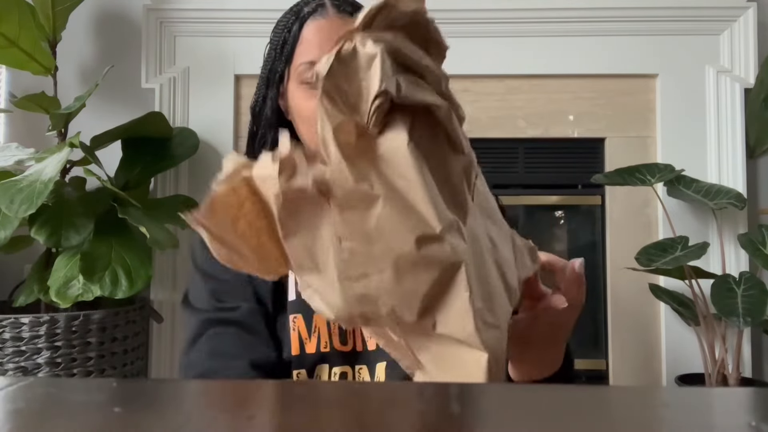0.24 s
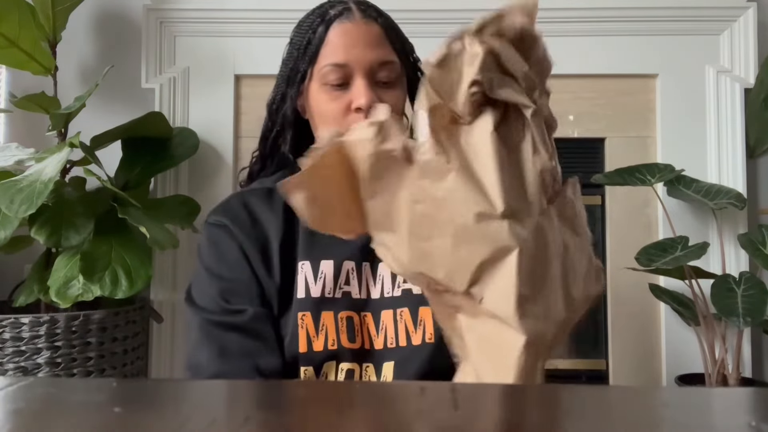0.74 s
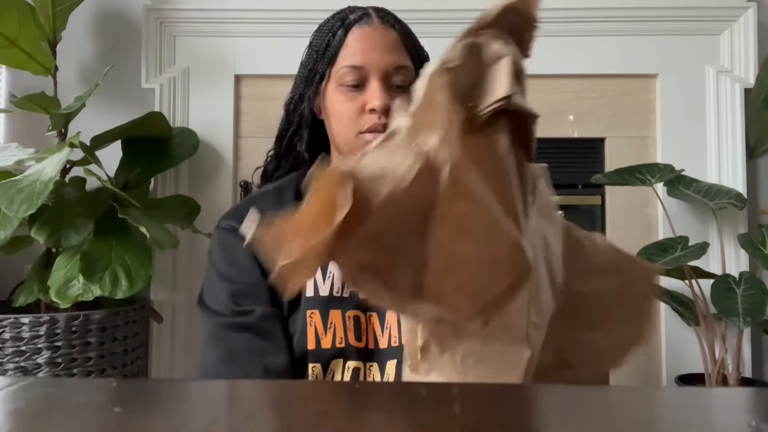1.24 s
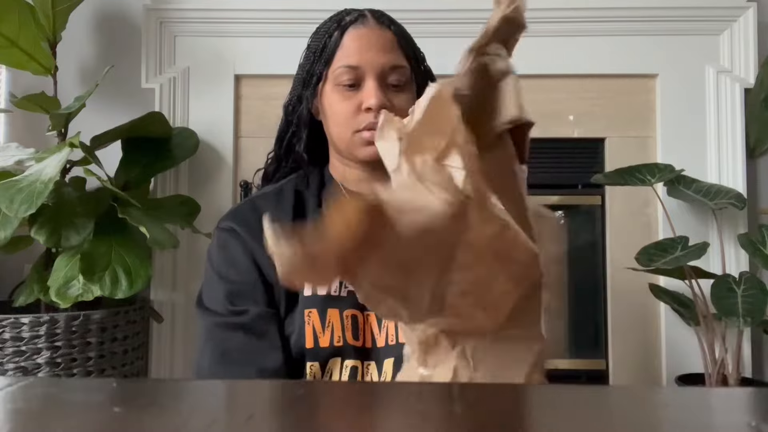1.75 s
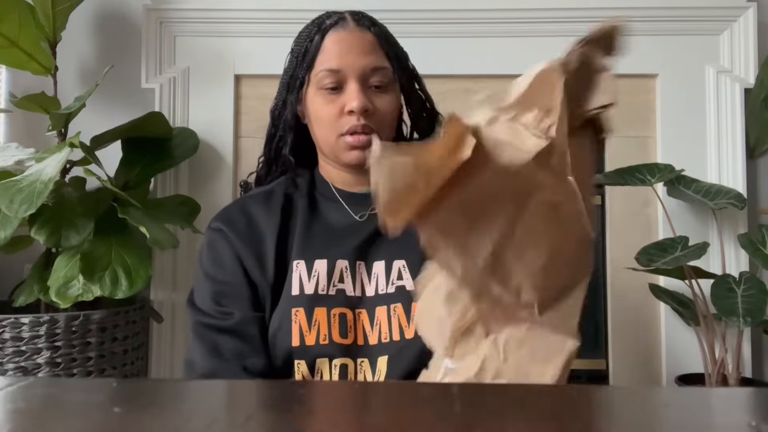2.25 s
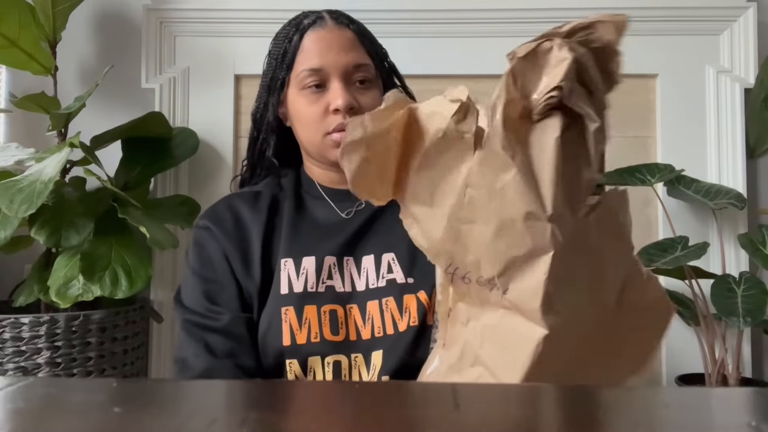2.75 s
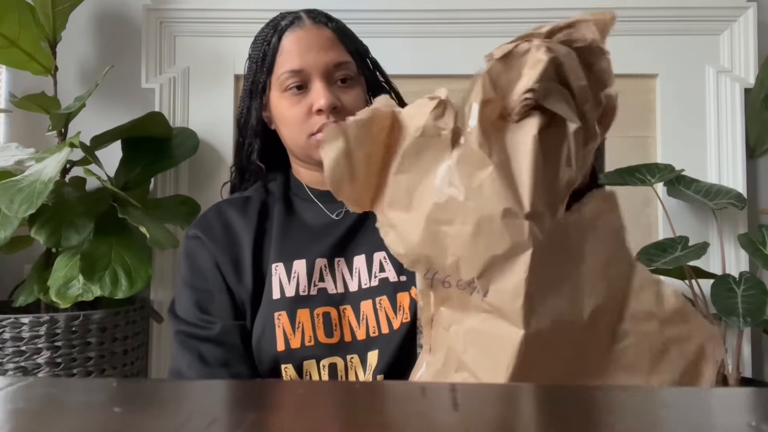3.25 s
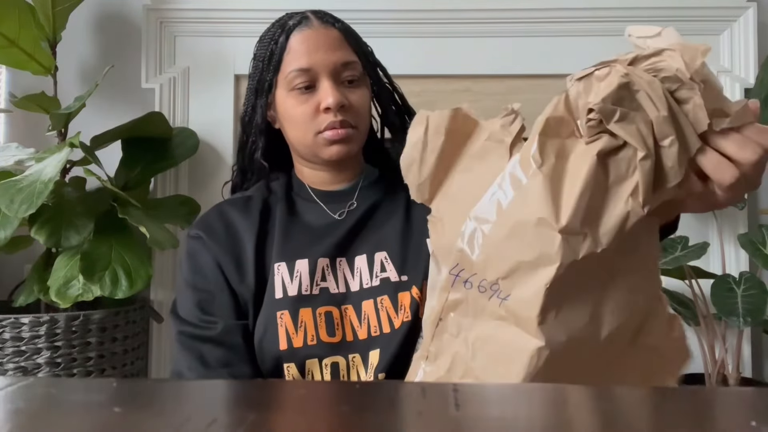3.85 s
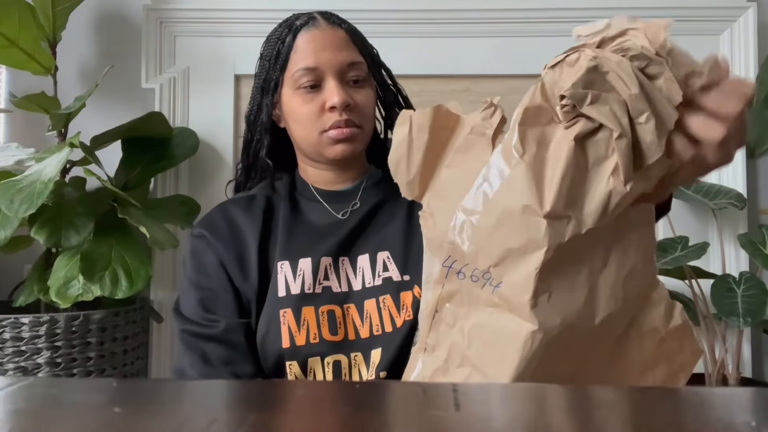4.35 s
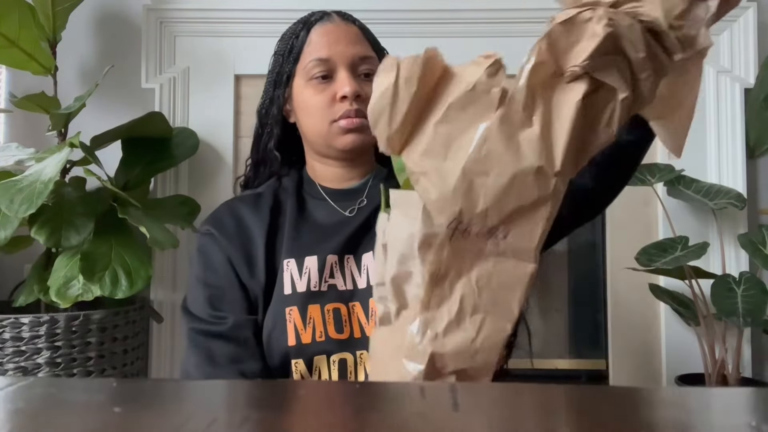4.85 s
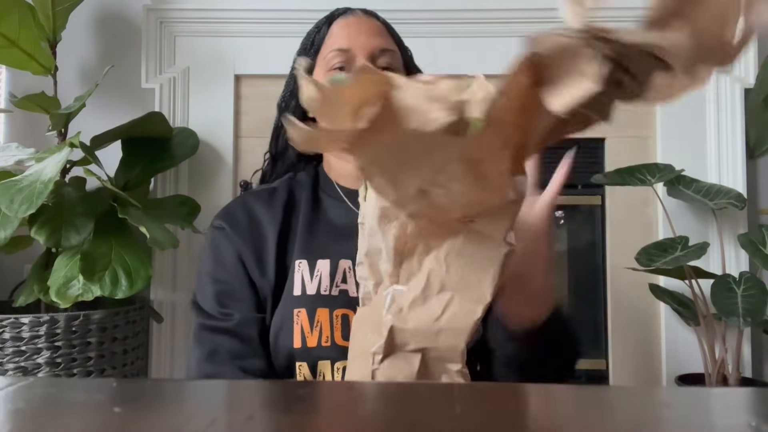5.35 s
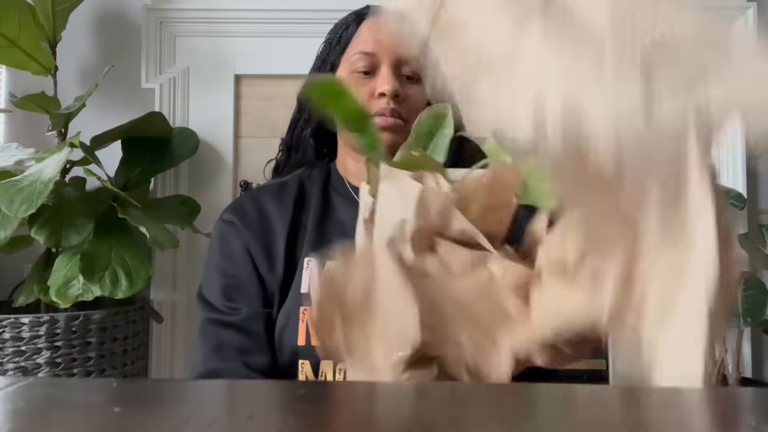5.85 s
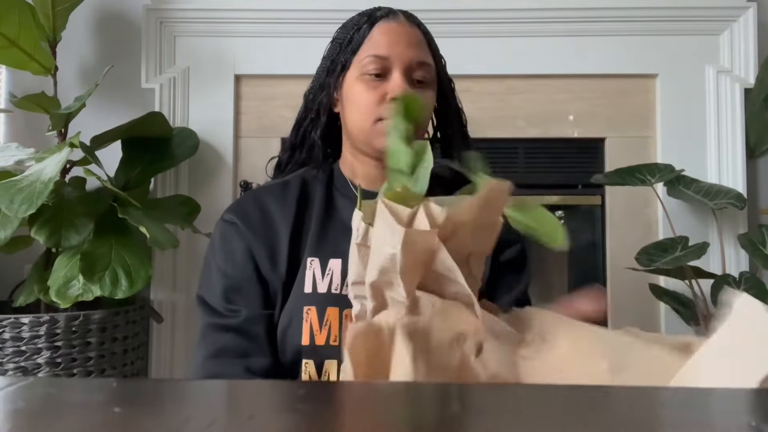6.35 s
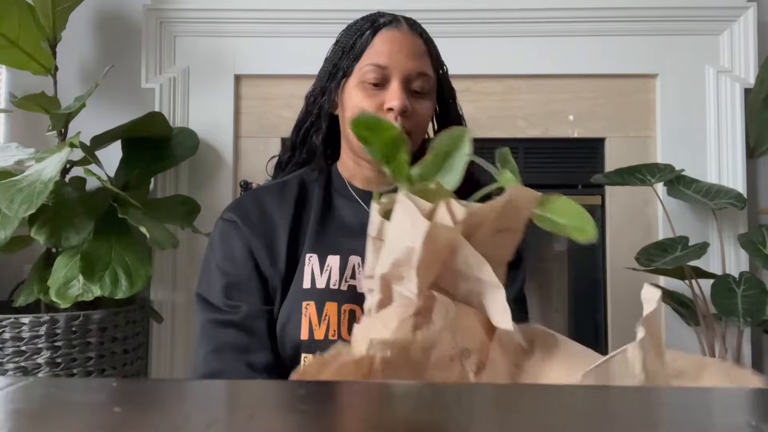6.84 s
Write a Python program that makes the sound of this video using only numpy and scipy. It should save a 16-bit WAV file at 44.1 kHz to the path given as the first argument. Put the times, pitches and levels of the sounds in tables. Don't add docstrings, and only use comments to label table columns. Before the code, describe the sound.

Stiff brown packing paper is unrolled by hand at close range, rustling and crackling in uneven bursts, then crumpled hard and bumped softly on a table.

```python
import sys
import numpy as np
from scipy import signal
from scipy.fft import rfft, irfft
from scipy.io import wavfile
from scipy.ndimage import uniform_filter1d, map_coordinates

SR = 44100
rng = np.random.default_rng(int(sys.argv[2]) if len(sys.argv) > 2 else 0)


def convert_level_to_amplitude(level_db):
    exponent = np.asarray(level_db, float) / 20
    return 10 ** exponent


def generate_wav(sig):
    pcm = np.round(np.clip(np.atleast_2d(sig).T, -1, 1) * 32767).astype(np.int16)
    wavfile.write(sys.argv[1], SR, pcm)


N = 312228
TIME = np.arange(N) / SR

# start of hold in seconds, hold in seconds, crackle in dB,
# weight of the large panels in dB above the crackle.
STROKES = [(0, 0.0067, -35.5, 3.5), (0.381, 0.029, -44, 6.5), (0.558, 0.042, -50, 1.5),
           (0.763, 0.064, -49.5, 10.5), (1.009, 0.15, -32, 3.5), (1.198, 0.16, -29.5, 2.5),
           (1.447, 0.13, -45, -1.5), (1.79, 0.05, -49.5, 4), (1.918, 0.02, -48, -2), (2.213, 0.086, -45, 3),
           (2.916, 0.04, -42, -1), (3.226, 0.095, -48, 1), (4.388, 0.09, -42.5, 0.5),
           (4.495, 0.17, -37.5, -2), (4.742, 0.089, -41.5, -1), (4.978, 0.057, -43, -6),
           (5.096, 0.047, -50.5, 5.5), (5.302, 0.051, -53, -2), (5.52, .015, -56, 6),
           (6.343, 0.063, -47.5, -7), (2.35, 0.034, -43.5, 2), (5.757, 0.13, -33, -1),
           (5.984, 0.072, -31.5, -2), (6.138, 0.045, -33, -3), (6.267, 0.018, -37.5, -7),
           (6.613, 0.12, -48.5, 9), (6.977, 0.037, -45.5, 3)]
JERKS = [(0.068, 0.014, -44.5, 2.5), (0.199, 0.011, -48.5, 10.5), (0.3, 0.023, -45.5, 6),
         (0.739, 0.049, -46.5, 1), (0.959, 0.055, -38.5, 8), (1.732, 0.076, -45, -5.5),
         (1.926, 0.085, -47.5, 3), (2.091, 0.043, -45, 8), (2.661, 0.09, -47.5, 0.5),
         (3.545, 0.08, -49.5, 2), (3.904, 0.017, -62.5, -6), (4.115, 0.0066, -66.5, -3),
         (4.631, 0.11, -38.5, 0), (5.525, 0.059, -46, 2.5), (5.624, 0.077, -43, 3),
         (5.743, 0.016, -32.5, -1), (6.578, 0.013, -39, -12), (6.874, 0.049, -47.5, -1)]
RISE_DB_PER_S, FALL_DB_PER_S, JERK_DB_PER_S = 215, 161, 3000
FALL_GROWS = 8
# time in seconds, crackle in dB,
# weight of the large panels in dB above the crackle.
SLIDE = [(0.0, -55, 6.5), (0.5, -55, 4.5), (1.65, -51, 4.5), (2.4, -61, 14), (2.6, -63.5, 4.5),
         (3.0, -43, -4.5), (3.45, -51.5, 4), (3.75, -62, 4), (4.0, -72, 12), (4.22, -82, 10.5),
         (4.6, -55, 15.5), (5.1, -76, 21), (5.47, -63, 1), (6.0, -40.5, -8), (6.4, -55, 4),
         (6.56, -45, -2.5), (6.85, -55, 1), (7.08, -70, 12)]
# time in seconds, lag of the left port in samples.
PLACE = [
    (0, 7.7),
    (1.2, 8.85),
    (2.2, 8.15),
    (3.5, 10.9),
    (5.2, 12.73),
    (5.8, 7.95),
    (7.08, 7.9),
]
# time in seconds, sheen in dB above the crackle.
FACING = [
    (0, -7.5),
    (1.3, -6),
    (2.0, -8.5),
    (3.0, -10),
    (3.8, -12),
    (4.5, -11),
    (5.2, -5.5),
    (6.0, -8),
    (7.08, -9),
]
PAN_DB = -1.3

# frequency in Hz, density in dB per Hz.
BODY = [(70, -47), (150, -6), (250, -2.5), (400, -1), (600, -1.5), (900, -3.5), (1200, -7), (1700, -35)]
KNOCK = [(700, -36.5), (1150, 0.5), (1700, 3.5), (2300, -1.5), (3400, -34.5)]
CRACKLE = [(1600, -16.5), (2500, 0.5), (4000, -4.5), (6000, -6), (7500, -13), (10000, -72.5)]
SHEEN = [(5000, -17), (7500, -3), (9000, 1), (12000, -3), (15500, -9), (17000, -18)]
KNOCK_SHARE = 0.41

# time in seconds, peak in dB, panel pitch in Hz,
# sheen in dB above the peak.
CRACKS = [(0.072, -26, 996, -15), (0.075, -22, 990, -16), (0.0924, -49, 435, -11), (0.1197, -38, 1600, -6),
          (0.2987, -42, 668, -2), (0.363, -41, 991, -1), (0.5585, -47, 676, 1.5), (1.4437, -30, 956, -27),
          (1.5227, -24.5, 670, -16), (1.6901, -41, 751, -11), (1.731, -35, 434, 3.5),
          (1.9213, -35, 1060, -21), (1.943, -25, 1340, -13), (1.961, -43, 436, -19), (2.106, -25, 670, -22),
          (2.182, -48, 608, -21), (2.227, -33, 1050, -13), (2.9074, -33.5, 520, -16),
          (2.9689, -24, 403, -34), (3.0209, -28.5, 418, -37), (3.1613, -27.5, 730, -18),
          (3.1994, -44, 797, -9), (3.5489, -31, 990, -14), (4.6288, -17.5, 690, -12.5),
          (4.9417, -40, 694, -17), (5.6362, -18, 810, -20), (5.756, -18, 695, -16),
          (5.8398, -18.5, 766, -19), (6.0033, -16.5, 775, -29), (5.997, -31, 2600, -16),
          (6.009, -30, 900, -25), (6.27, -37, 2970, -28)]
CRACK_BODY_DB, CRACK_KNOCK_DB = -14, -15
# time in seconds, peak in dB, panel pitch in Hz, body in dB above the peak.
POPS = [(0.0111, -26.5, 378, -5), (0.161, -38, 380, -6), (0.319, -35, 438, 0), (0.6045, -41, 380, -0.5),
        (0.7262, -43, 381, 6), (0.751, -43, 439, -10), (0.952, -32, 605, -2.5), (2.095, -37, 662, -2),
        (2.148, -29.5, 670, 2.5), (2.665, -33, 684, -8), (2.7177, -37, 694, -8), (3.8891, -56, 715, 16),
        (4.5447, -27.5, 513, -1), (4.6593, -29.5, 774, -2.5), (5.1647, -42, 546, 0), (5.184, -42, 467, -1),
        (5.738, -31, 526, -10), (6.0394, -24, 656, -10), (6.4636, -47, 396, -2), (6.607, -31, 463, -12),
        (6.664, -31, 850, -4.5), (6.708, -25, 412, -18), (6.7296, -33, 590, -5)]
POP_KNOCK_DB, POP_SHEEN_DB = -2.5, -24
# time in seconds, peak in dB,
# facet pitch in Hz, knock in dB above the peak.
KNOCKS = [(0.2162, -27.5, 1270, -9), (0.7854, -41, 1830, -1), (1.909, -50, 1270, -6),
          (3.3272, -33, 1550, 0), (4.7003, -24.5, 1320, -3), (5.016, -41, 2430, -5),
          (5.122, -40, 1560, 2.5), (5.21, -45, 1880, 4.5), (5.5321, -28, 1400, 5.5),
          (5.7, -31.5, 1670, -5.5), (5.932, -22, 1910, -23), (6.1428, -19, 1840, -9),
          (6.596, -20.5, 1690, -8), (6.6206, -22.5, 1910, -6), (6.9428, -36, 1520, -1),
          (3.568, -53, 1500, -11),
    (5.508, -42, 2110, 6),
    (5.884, -35, 1500, -20),
    (6.177, -26, 1800, -1),
    (6.684, -33, 2550, -2),
    (6.74, -49.5, 1910, 18),
]
KNOCK_BODY_DB, KNOCK_SHEEN_DB = -8.5, -16.5
# time in seconds, peak in dB, panel pitch in Hz.
SETTLING = [(2.496, -50, 773), (3.258, -41, 690), (3.4087, -74, 770), (3.6744, -40, 670),
            (3.7754, -50, 2820), (3.8026, -47, 455), (3.9048, -41.5, 507), (4.001, -58, 700),
            (4.0337, -53, 463), (4.121, -52, 437), (4.2804, -55, 764), (4.3248, -42, 441),
            (4.3958, -47, 522), (4.9708, -48, 2480), (5.295, -41.5, 526), (5.39, -59, 427),
            (5.49, -41, 450), (6.1117, -38, 605), (6.4183, -40, 1040), (6.514, -45, 1570)]
SETTLE_BODY_DB, SETTLE_KNOCK_DB, SETTLE_SHEEN_DB = -11, -6, -19

# middle in seconds, length in
# seconds, pitch in Hz, level in dB.
SCRAPES_AND_NICKS = [(0.503, 0.068, 1400, -66), (0.529, 0.083, 5000, -74), (0.682, .06, 2500, -52),
                     (1.029, 0.09, 4330, -44), (1.079, 0.086, 5500, -40), (1.136, 0.041, 1600, -29),
                     (1.13, 0.053, 390, -35), (1.153, 0.12, 5340, -47), (1.269, 0.13, 704, -37),
                     (1.365, 0.035, 1200, -55), (1.945, 0.0056, 3180, -30), (1.946, 0.006, 5200, -41),
                     (2.114, 0.038, 705, -50), (4.452, 0.076, 3080, -46), (4.506, 0.043, 3100, -45),
                     (4.549, 0.042, 3220, -43), (4.664, 0.013, 810, -33.5), (5.317, 0.053, 3040, -60),
                     (5.528, 0.015, 2110, -37), (5.548, .012, 1900, -48), (5.756, 0.012, 2970, -47),
                     (5.802, 0.15, 4300, -46), (5.82, 0.14, 638, -43), (6.028, 0.077, 776, -37.5),
                     (6.047, .05, 5600, -38), (6.059, 0.015, 706, -42), (6.145, 0.017, 2180, -27),
                     (6.138, 0.025, 4400, -39.5), (6.2, 0.02, 1720, -36), (6.275, 0.04, 4300, -44),
                     (6.932, 0.12, 121, -50), (6.006, .014, 1950, -32), (6.359, 0.11, 4070, -57),
                     (1.2, 0.054, 504, -45), (1.213, 0.084, 4300, -43), (1.39, 0.032, 3500, -45),
                     (2.395, 0.015, 330, -44), (5.639, 0.013, 1610, -32.5), (5.76, .03, 5500, -46),
                     (0.224, 0.0079, 5630, -45.5), (.321, 0.0034, 895, -39), (0.318, .008, 5460, -48),
         (0.582, .008, 3680, -53), (0.729, 0.011, 680, -48), (0.79, 0.0092, 3900, -41.5),
         (1.106, 0.0093, 3400, -33.5), (1.309, .01, 4330, -31.5), (1.909, 0.0044, 1380, -41),
         (2.104, .006, 4840, -41), (2.147, 0.0052, 9200, -40), (2.184, 0.0087, 5800, -44.5),
         (2.498, .008, 1500, -57.5), (3.547, 0.0065, 3400, -46.5), (3.891, 0.0073, 1290, -47),
         (3.908, 0.005, 3100, -56), (3.906, .006, 5800, -51), (4.13, 0.017, 5440, -60),
         (5.119, 0.0062, 3900, -46), (5.214, 0.0071, 1940, -41), (5.211, 0.0063, 4430, -50),
         (5.219, 0.0079, 790, -48), (5.373, 0.016, 547, -61.5), (5.528, 0.0036, 1490, -35),
         (5.545, 0.0078, 1500, -51), (2.304, 0.011, 755, -40), (5.703, 0.014, 363, -45),
         (5.739, 0.0071, 1520, -39), (5.765, 0.019, 379, -35.5), (5.843, 0.021, 374, -39),
         (6.21, 0.016, 560, -47), (6.277, .01, 3000, -30), (6.334, 0.031, 555, -51),
         (6.42, 0.0073, 1500, -42), (6.464, 0.0057, 1500, -48), (6.606, 0.0058, 596, -33),
         (6.652, 0.0089, 546, -40), (6.666, .01, 1500, -42), (6.683, 0.011, 2480, -29.5),
         (6.731, 0.0047, 1620, -40), (6.792, .02, 380, -57), (6.875, 0.013, 337, -45),
         (6.944, 0.0064, 1590, -39), (7.015, 0.036, 210, -46), (7.038, 0.013, 765, -54)]
NICK_S = .013
SCRAPE_WIDTH, SCRAPE_GRIT_DB = 0.28, 1

# time in seconds,
# middle band in dB, top band in dB.
CLICKS = [(0.218, -35, -48), (.319, -38, -46), (0.365, -44, -44), (.726, -41, -52), (1.459, -39, -48),
          (1.519, -39, -48), (1.732, -32, -34), (1.909, -45, -55), (1.943, -24, -33), (1.962, -34, -48),
          (2.097, -36, -46), (2.147, -28, -40), (2.496, -52, -65), (2.667, -46, -50), (2.968, -25, -39),
          (3.26, -50, -46), (3.328, -44, -48), (3.549, -38, -47), (3.568, -54, -48), (4.057, -57, -72),
          (4.543, -36, -21), (4.629, -30, -33), (4.643, -38, -20), (4.878, -39, -55), (5.211, -46, -58),
          (5.294, -42, -53), (5.298, -56, -38), (5.331, -56, -38), (5.355, -57, -41), (5.397, -55, -35.5),
          (5.489, -57, -61), (5.526, -45, -42), (5.636, -34, -32), (5.655, -29, -41), (5.702, -38, -39),
          (5.735, -34, -36), (5.84, -25, -38), (6.421, -39, -52), (6.464, -45, -33), (6.588, -33, -42),
          (6.597, -32, -34), (6.622, -31, -33), (6.708, -30, -37), (6.729, -32, -47), (6.942, -38, -52),
          (4.699, -31, -44), (4.658, -34, -44)]
# frequency in Hz, gain in dB.
CLICK_MIDDLE = [(400, -30), (900, -3), (2000, 0), (6000, 0), (7500, -20), (10000, -60)]
CLICK_TOP = [(4500, -36), (6500, -1), (8000, 3), (12000, -1.5), (16500, -4)]
CLICK_RISE_S, CLICK_T60_S = .0003, 0.012
BRACE_DB, BRACE_S = 2, 0.0093

# time in seconds, level in dB, first pitch in Hz, last pitch in Hz,
# t60 in seconds.
BUMPS = [
    (6.867, -31, 423, 95, 0.23),
    (6.995, -43, 324, 129, 0.093),
]
TABLE_S, TABLE_SHARE = .00092, 0.063

# frequency in Hz, t60 in seconds.
ROOM = [(200, 0.19), (2000, 0.26), (10000, 0.23)]
# time in seconds, level in dB.
GUSTS = [
    (.35, -45),
    (.43, -55),
    (1.34, -43.5),
    (3.6, -58),
    (3.75, -52),
    (3.92, -59),
    (5.8, -50),
    (6.3, -46),
    (6.5, -53),
    (7.0, -46),
]
GUST_S = 0.1
STILL_AIR_DB, STIRRED_DB, STIR_GROWS = -54, -50, 0.68
# frequency in Hz, density in dB per Hz.
RUMBLE = [(15, -46), (28, -23), (65, -4), (126, -7.5), (194, -14), (260, -13.5), (340, -58.5), (570, -120)]
HUSH = [(150, -17.5), (300, 1.5), (600, -5), (2000, -22), (5000, -28), (9500, -26), (16000, -30)]

# frequency in Hz, gain in dB.
SUM = [(6300, 1), (7300, -4), (8000, -1.5), (8800, -6.5), (10300, -1), (13800, 2), (14600, -13)]
DIFFERENCE = [(9000, 0.5), (10300, -6), (13300, -1.5), (15000, 5)]
SHARP = [.075, .12, .22, .364, 1.524, 1.733, 1.944, 2.106, 2.148, 2.66, 2.97, 3.2, 3.55, 3.805, 3.905,
         4.122, 4.34, 4.63, 5.295, 5.39, 5.51, 5.637, 5.705, 6.465, 6.598, 6.623, 6.71]
SHARP_S = .009
FRAME, GRID = 1024, 658


def unit(x):
    return x / np.sqrt(np.mean(x ** 2) + 1e-20)


def along(points, hz):
    f, v = np.transpose(points)
    return np.interp(np.log(hz + 1), np.log(f + 1), v)


def louder(levels_db):
    return 10 * np.log10(np.sum(convert_level_to_amplitude(levels_db) ** 2, 0))


def wobble(rate):
    return map_coordinates(rng.standard_normal(int(N * rate / SR) + 4), [TIME * rate])


def coloured(x, points):
    hz = np.fft.rfftfreq(4096, 1 / SR)
    cepstrum = irfft(np.log(convert_level_to_amplitude(along(points, hz))))
    cepstrum[1:2048] *= 2
    cepstrum[2049:] = 0
    response = irfft(np.exp(rfft(cepstrum)))
    return signal.oaconvolve(x, response[None], axes=1)[:, :N]


def placed(seconds, shapes, scatter, pan_db):
    at = np.round(seconds * SR).astype(int)[:, None] + np.arange(shapes.shape[1])
    lag = np.interp(seconds, *np.transpose(PLACE)) + scatter
    late = at + np.clip(np.round(lag), 0, 30).astype(int)[:, None]
    ports = []
    for index, side in ((late, .5), (at, -.5)):
        heard = shapes * convert_level_to_amplitude(side * pan_db)[:, None]
        ports.append(np.bincount(index.ravel(), heard.ravel(), N + SR)[:N])
    return np.array(ports)


def sizes(chance, spread_db):
    return convert_level_to_amplitude(spread_db * np.minimum(-np.log(chance), 2.9))


def rustle():
    crackle_db, body_db = hands()
    weight_db = body_db - crackle_db
    sheen_db = np.interp(TIME, *np.transpose(FACING))
    facets = panels(count=8000, cycles=3.9, spread_db=2.1)
    sparse = np.clip((-14.5 - crackle_db) / 25, .3, 1)
    clumps = 1.87 * wobble(40) + 0.75 * wobble(130)
    bands = ((BODY, weight_db - 2.5, .9), (KNOCK, KNOCK_SHARE * weight_db - 2.0, .8),
             (CRACKLE, -.6, .7), (SHEEN, sheen_db + 6.5, .6))
    total = 0
    for colour, level_db, ring in bands:
        grains = 0.6 * ticks(count=9000, spread_db=1.6) + ring * facets
        rubbing = 1.49 * ticks(count=120000, spread_db=1.5)
        sheet = coloured(rubbing + 1.25 * sparse * grains, colour)
        sheet = patchy(sheet, depth_db=1.2 + 1.2 * sparse)
        sheet = unit(sheet * convert_level_to_amplitude(sparse ** 2 * (clumps + 0.18 * wobble(25))))
        total = total + sheet * convert_level_to_amplitude(crackle_db + level_db + 4.1 * (0.5 - sparse))
    return total


def hands():
    s, hold, db, weight_db = np.transpose(STROKES + JERKS)[:, :, None]
    rise = np.repeat([RISE_DB_PER_S, JERK_DB_PER_S], [len(STROKES), len(JERKS)])[:, None]
    fall = FALL_DB_PER_S + FALL_GROWS * np.clip(db + 49.0, 0, None)
    t = TIME[::64]
    stroke_db = db - rise * np.clip(s - t, 0, None) - fall * np.clip(t - s - hold, 0, None)
    at, slide_db, slide_weight_db = np.transpose(SLIDE)
    crackle_db = louder(np.vstack([stroke_db, np.interp(t, at, slide_db)]))
    body_db = louder(np.vstack([stroke_db + weight_db, np.interp(t, at, slide_db + slide_weight_db)]))
    return np.interp(TIME, t, crackle_db), np.interp(TIME, t, body_db)


def ticks(count, spread_db):
    s, size = rng.random((2, count))
    sign, place, pan = rng.standard_normal((3, count))
    slips = (sign * sizes(size, spread_db))[:, None]
    return unit(placed(s * N / SR, slips, 1.8 * place, PAN_DB + 4.9 * pan))


def panels(count, cycles, spread_db):
    s, pitch, size = rng.random((3, count))
    place, pan = rng.standard_normal((2, count))
    hz = 250 * 55 ** pitch[:, None]
    turns = hz * np.arange(380) / SR
    rings = np.sin(2 * np.pi * turns) * convert_level_to_amplitude(-60 * turns / (3 * cycles)) * hz / 2000
    rings *= sizes(size, spread_db)[:, None]
    return unit(placed(s * N / SR, rings, 2.0 * place, PAN_DB + 8.1 * pan))


def patchy(x, depth_db):
    z = signal.stft(x, nperseg=512)[2]
    field = uniform_filter1d(rng.standard_normal(z.shape[1:]), size=3, axis=0)
    field = unit(uniform_filter1d(field, size=12, axis=1))
    depth = np.interp(np.arange(z.shape[2]) * 256, np.arange(N), depth_db)
    return signal.istft(z * convert_level_to_amplitude(depth * field), nperseg=512)[1][:, :N]


def braced():
    s = np.sort(np.transpose(CLICKS)[0])
    ahead = np.append(s, np.inf)[np.searchsorted(s, TIME)] - TIME
    return convert_level_to_amplitude(-BRACE_DB * np.exp(-(ahead / BRACE_S) ** 2))


def snaps():
    s, peak_db, hz, body_db, knock_db, sheen_db = np.transpose(creases())[:, :, None]
    t = np.arange(1500) / SR
    place, pan, life = rng.standard_normal((len(s), 3)).T
    noise = np.sign(rng.standard_normal((len(s), len(t))))

    def put(shapes):
        return placed(s[:, 0], shapes * convert_level_to_amplitude(peak_db), .6 * place, PAN_DB + 2.5 * pan)

    def burst(t60):
        return convert_level_to_amplitude(-60 * t / (t60 * np.exp(0.25 * life[:, None]))) * (1 - np.exp(-t / 0.0011))

    ring_db = np.where(hz < 1100, body_db, knock_db) + 7.5
    ring = put(np.sin(2 * np.pi * hz * t) * burst(12 / hz) * convert_level_to_amplitude(ring_db))
    crack = coloured(put(noise * (burst(0.02) * convert_level_to_amplitude(1.0) + burst(0.0048) * convert_level_to_amplitude(13.5))), CRACKLE)
    knock = coloured(put(noise * burst(0.018) * convert_level_to_amplitude(knock_db + 16.0)), KNOCK)
    bright = burst(0.017) + burst(0.005) * convert_level_to_amplitude(4.5)
    sheen = coloured(put(noise * bright * convert_level_to_amplitude(sheen_db + 15.5)), SHEEN)
    thump = coloured(put(noise * burst(0.016) * convert_level_to_amplitude(body_db + 16.0)), BODY)
    return ring + crack + knock + sheen + thump


def creases():
    return ([(s, db, hz, CRACK_BODY_DB, CRACK_KNOCK_DB, sheen_db) for s, db, hz, sheen_db in CRACKS]
            + [(s, db, hz, body_db, POP_KNOCK_DB, POP_SHEEN_DB) for s, db, hz, body_db in POPS]
            + [(s, db, hz, KNOCK_BODY_DB, knock_db, KNOCK_SHEEN_DB) for s, db, hz, knock_db in KNOCKS]
            + [(s, db, hz, SETTLE_BODY_DB, SETTLE_KNOCK_DB, SETTLE_SHEEN_DB) for s, db, hz in SETTLING])


def scrapes():
    s, length, hz, db = np.transpose(SCRAPES_AND_NICKS)[:, :, None]
    t = np.arange(-4096, 4096) / SR
    sign, grit = rng.standard_normal((len(s), 2, len(t))).transpose(1, 0, 2)
    f = np.fft.rfftfreq(len(t), 1 / SR)
    damping = 1j * f * hz * SCRAPE_WIDTH
    band = damping / (hz ** 2 - f ** 2 + damping)
    rung = irfft(rfft(sign * convert_level_to_amplitude(SCRAPE_GRIT_DB * grit)) * band ** 2)
    steep = np.where((t < 0) & (length < NICK_S), 2.5, 1)
    swell = np.exp(-(2 * steep * t / length) ** 4)
    rung /= np.sqrt(np.sum((rung * swell) ** 2, 1) / np.sum(swell ** 2, 1))[:, None]
    return placed(s[:, 0] + t[0], rung * swell * convert_level_to_amplitude(db), 0, np.full(len(s), PAN_DB))


def clicks():
    s, middle_db, top_db = np.transpose(CLICKS)[:, :, None]
    t = np.arange(600) / SR
    noise = np.sign(rng.standard_normal((len(s), len(t))))
    noise = noise * convert_level_to_amplitude(-60 * t / CLICK_T60_S) * (1 - np.exp(-t / CLICK_RISE_S))

    def put(db):
        return placed(s[:, 0], noise * convert_level_to_amplitude(db), 0, np.full(len(s), PAN_DB))

    return coloured(put(middle_db + 3.5), CLICK_MIDDLE) + coloured(put(top_db + 2.5), CLICK_TOP)


def bumps():
    out = np.zeros(N)
    for s, db, first_hz, last_hz, t60 in BUMPS:
        t = np.clip(TIME - s, 0, None)
        hz = last_hz + (first_hz - last_hz) * np.exp(-t / 0.011)
        tone = np.sin(2 * np.pi * np.cumsum(hz * (t > 0)) / SR)
        rise = 1 - np.exp(-(t / 0.015) ** 2)
        out += convert_level_to_amplitude(db - 60 * t / t60 + 4.1 * wobble(70)) * rise * tone
    return out


def room(x):
    hz, t, z = signal.stft(rng.standard_normal((2, SR // 2)), SR, nperseg=256)
    tail = signal.istft(z * convert_level_to_amplitude(-60 * t / along(ROOM, hz)[:, None]), SR, nperseg=256)[1]
    delayed = np.pad(x, ((0, 0), (150, 0)))
    return signal.fftconvolve(delayed, tail / np.linalg.norm(tail[0]), axes=1)[:, :N]


def air():
    gusts_db = [db - 9 * ((TIME - s) / GUST_S) ** 2 for s, db in GUSTS]
    stirred_db = STIRRED_DB + STIR_GROWS * (hands()[1] + 35)
    rumble_db = louder([STILL_AIR_DB + 0 * TIME, stirred_db] + gusts_db)
    shared, apart = rng.standard_normal((2, N))
    low = coloured(shared + 0.23 * apart * [[1], [-1]], RUMBLE)
    low = unit(low * convert_level_to_amplitude(1.9 * wobble(12)))
    hush = unit(coloured(rng.standard_normal((2, N)), HUSH))
    return low * convert_level_to_amplitude(rumble_db - 2.5) * convert_level_to_amplitude([[-.6], [.6]]) + convert_level_to_amplitude(-65.0) * hush


def scene():
    paper, folds = rustle() * braced(), snaps()
    paper = paper + TABLE_SHARE * np.roll(paper, round(TABLE_S * SR), axis=1)
    reverb = convert_level_to_amplitude(-8.5) * room(paper) + convert_level_to_amplitude(-6) * room(folds)
    return paper + folds + reverb + bumps() + air() + scrapes() + clicks()


def starved(mid, side):
    frames = dict(fs=SR, window="cosine", nperseg=2 * FRAME, noverlap=FRAME)
    hz, t, z = signal.stft(np.pad([mid, side], ((0, 0), (FRAME - GRID, 0))), **frames)
    held = np.arange(len(t)) // 2
    drift = .6 * rng.standard_normal((5, len(t)))[:, held]
    chance = rng.random((60, len(t)))[(hz / 420).astype(int)][:, held]
    hz = hz[:, None]

    def between(lo_hz, hi_hz):
        return (hz > lo_hz) & (hz < hi_hz)

    def back(keep):
        return signal.istft(z * keep, **frames)[1][:, FRAME - GRID:][:, :N]

    gap_mid = between(7250 + 600 * drift[0], 8700 + 500 * drift[1])
    gap_mid = gap_mid & (chance < .9) & (drift[4] < .7) & (t > .42)
    gone_mid = gap_mid | (hz > 13750 + 600 * drift[2])
    gap_side = between(10350 + 250 * drift[3], 13200 + 500 * drift[4])
    gone_side = gap_side | (hz > 13000) & (chance < .3)
    thin = back(~np.array([gone_mid, gone_side]) & (hz < 15750))
    full = back(hz < 16400)
    nearest_s = np.abs(TIME[::12] - np.array(SHARP)[:, None]).min(0)
    sharp = np.exp(-(nearest_s / SHARP_S) ** 4).repeat(12)
    return thin + sharp * (full - thin)


def low_pass(x):
    return signal.sosfilt(signal.butter(12, 16625, fs=SR, output="sos"), x)


def record(dry):
    hz = np.fft.rfftfreq(N, 1 / SR)
    left, right = rfft(dry)
    mid = irfft((left + right) / 2 * convert_level_to_amplitude(along(SUM, hz)), N)
    side = irfft((left - right) / 2 * convert_level_to_amplitude(along(DIFFERENCE, hz)), N)
    mid, side = starved(mid, side)
    return low_pass(np.array([mid + side, mid - side]))


dry = scene()
out = record(dry)
generate_wav(out)
```